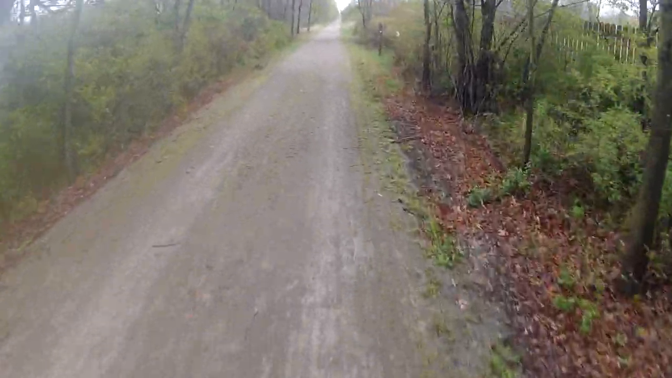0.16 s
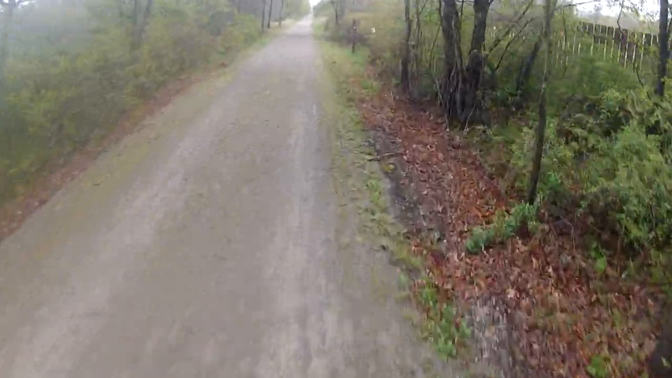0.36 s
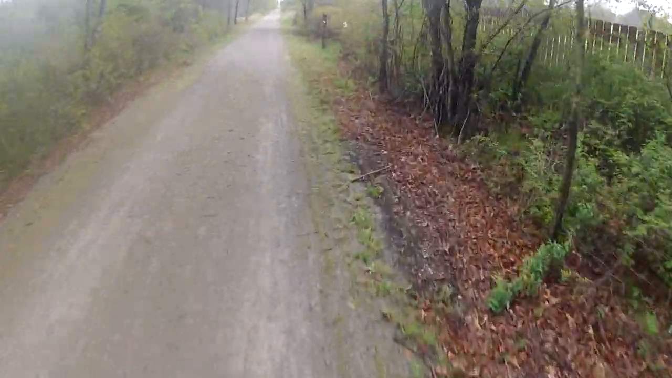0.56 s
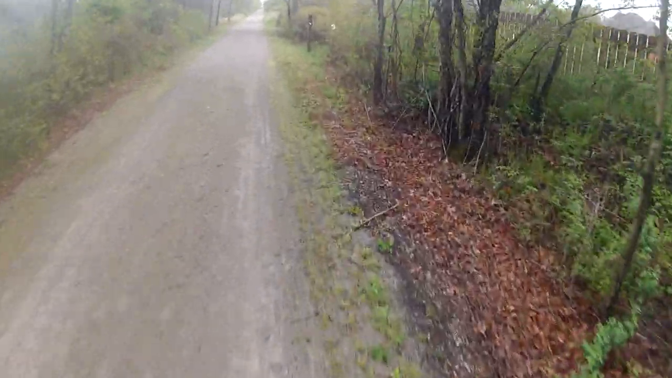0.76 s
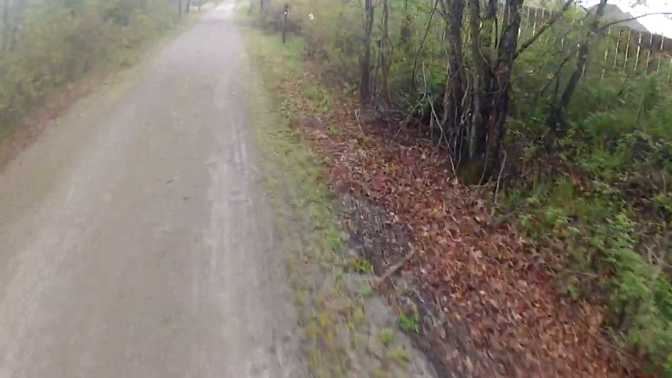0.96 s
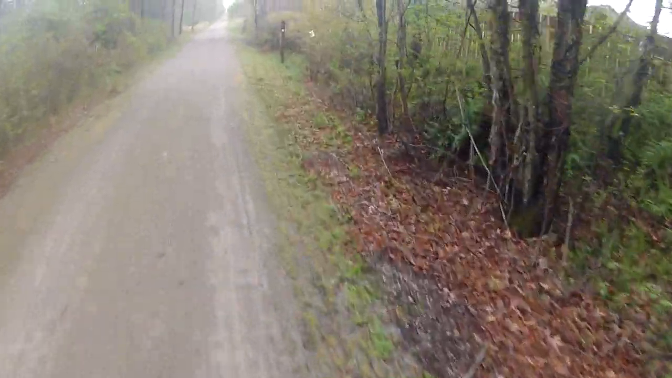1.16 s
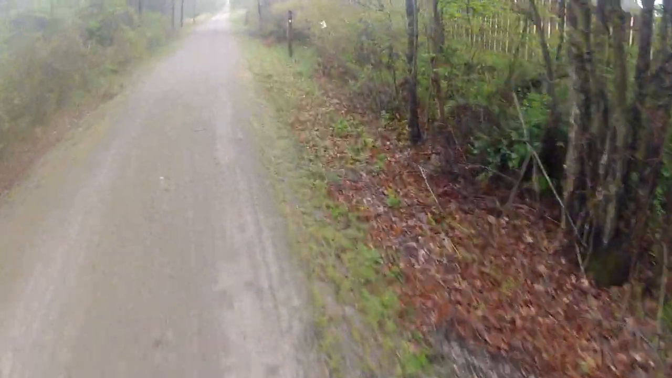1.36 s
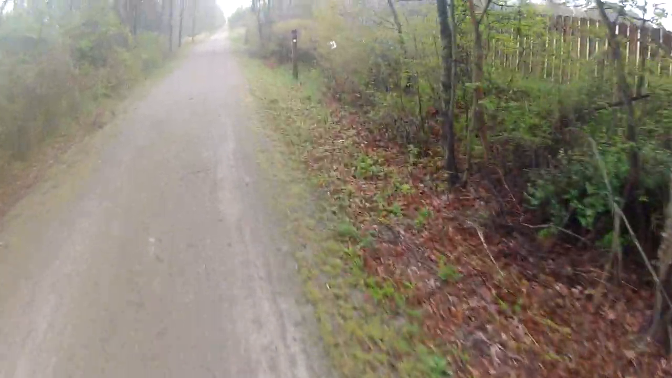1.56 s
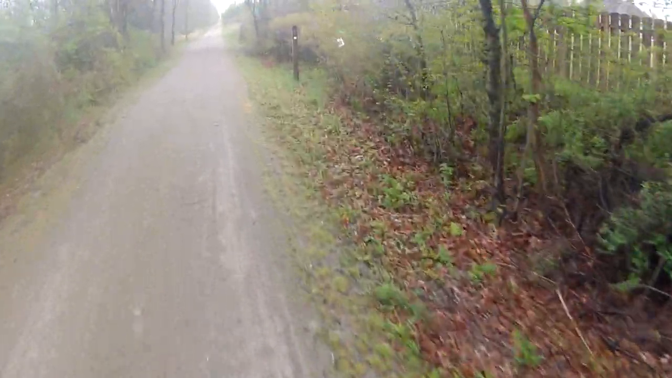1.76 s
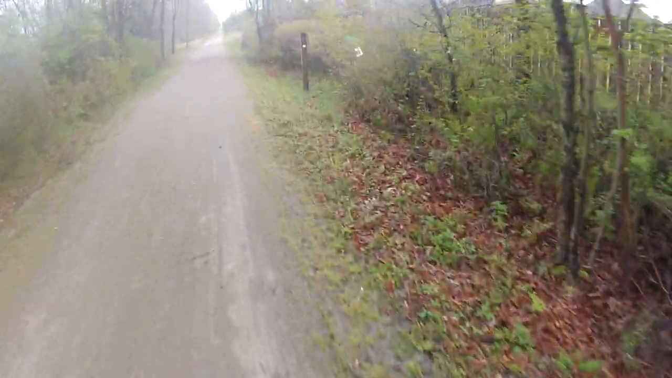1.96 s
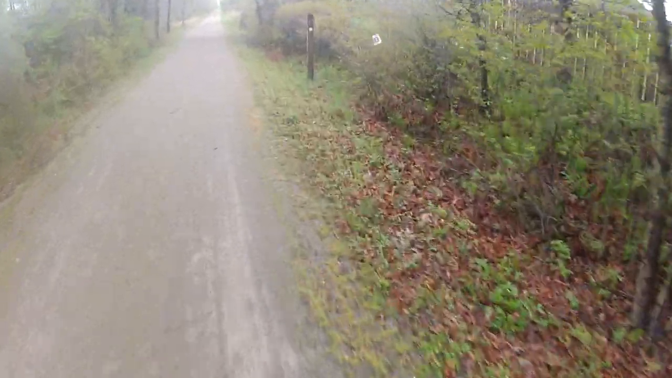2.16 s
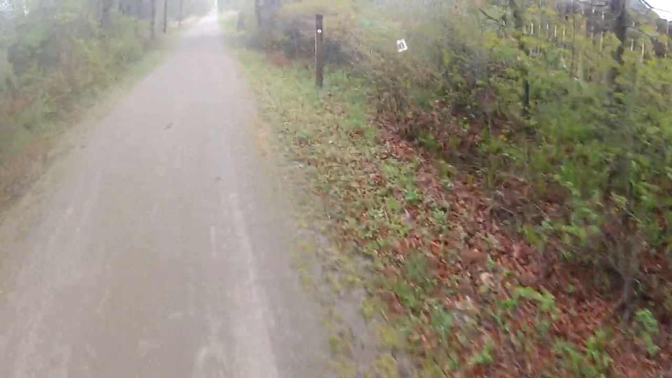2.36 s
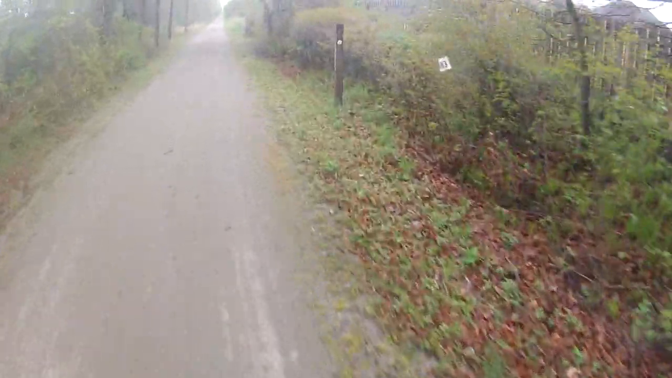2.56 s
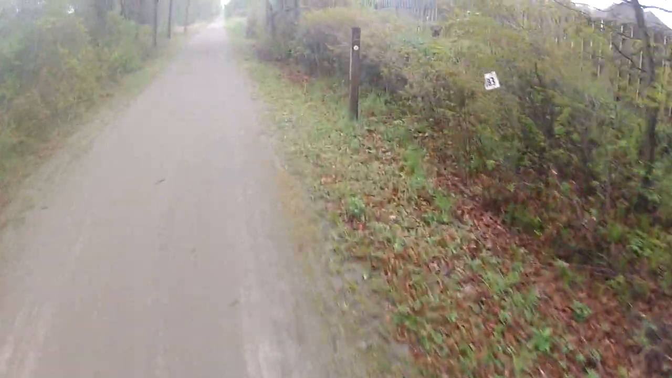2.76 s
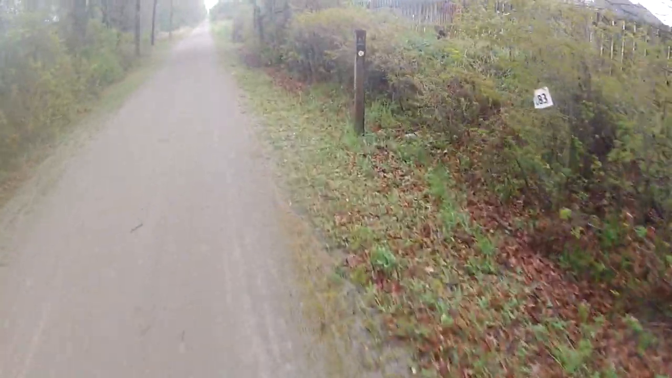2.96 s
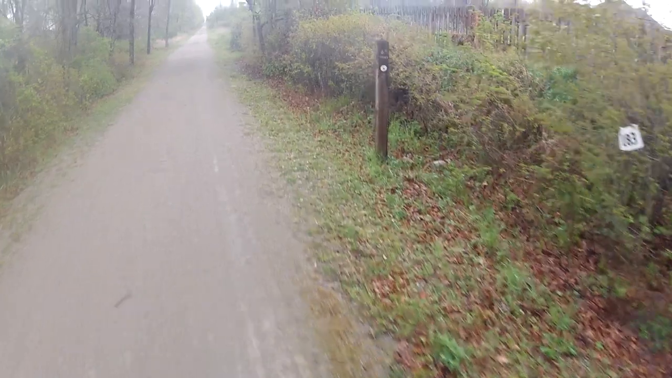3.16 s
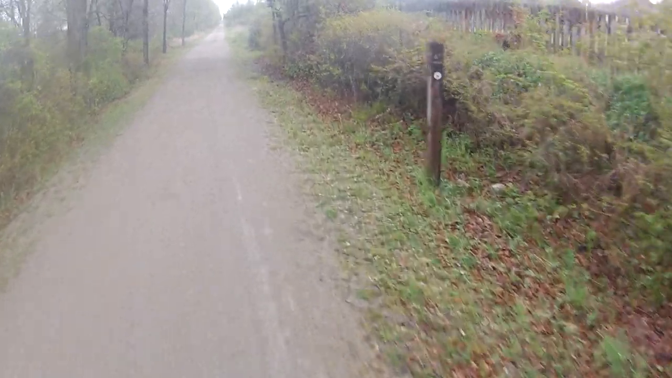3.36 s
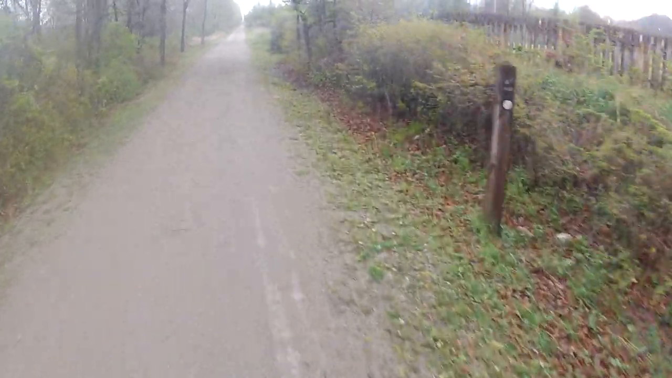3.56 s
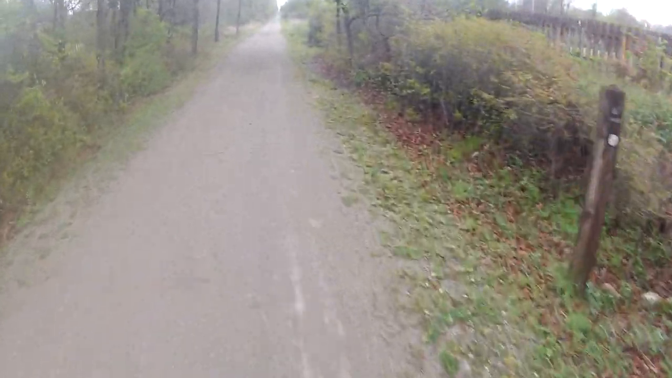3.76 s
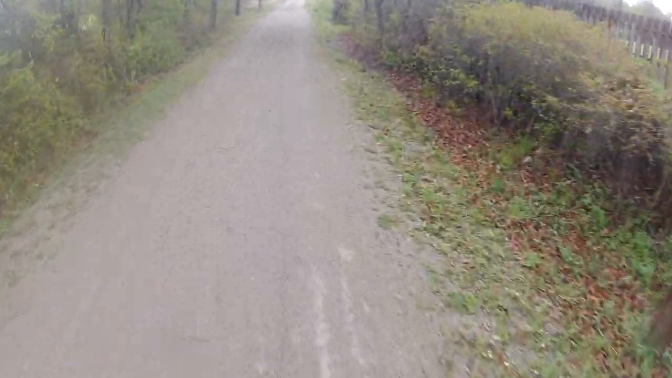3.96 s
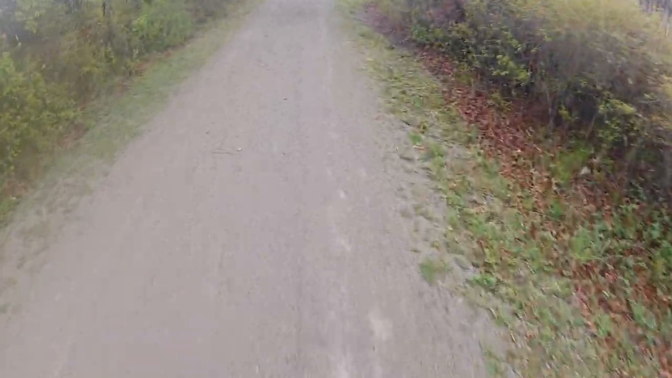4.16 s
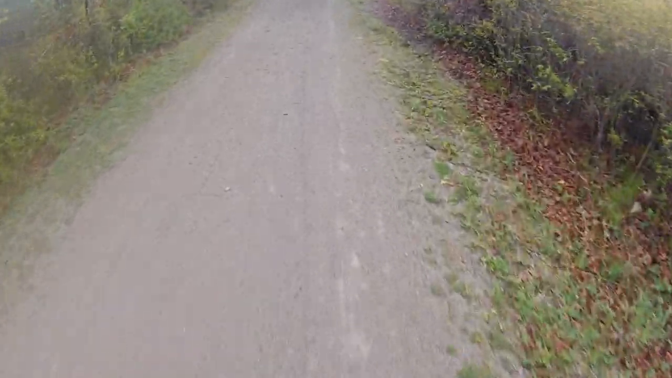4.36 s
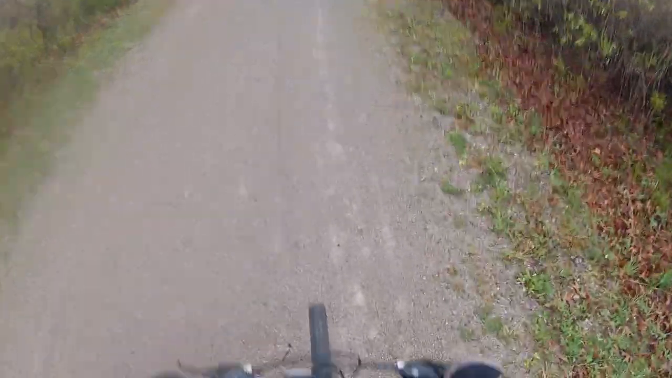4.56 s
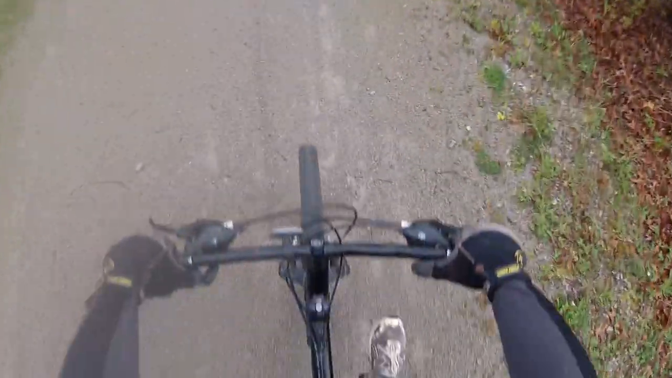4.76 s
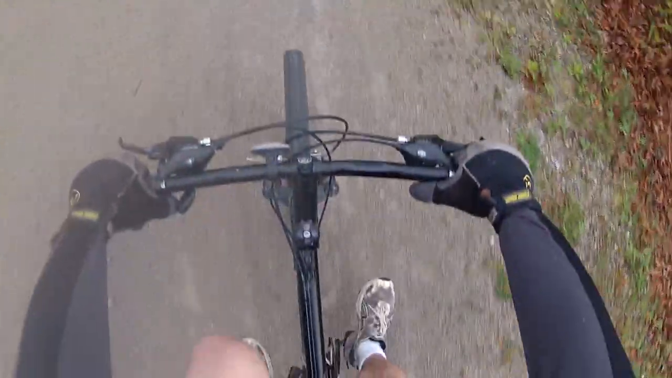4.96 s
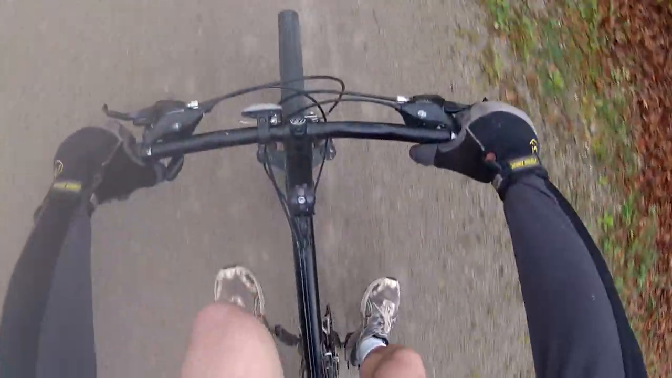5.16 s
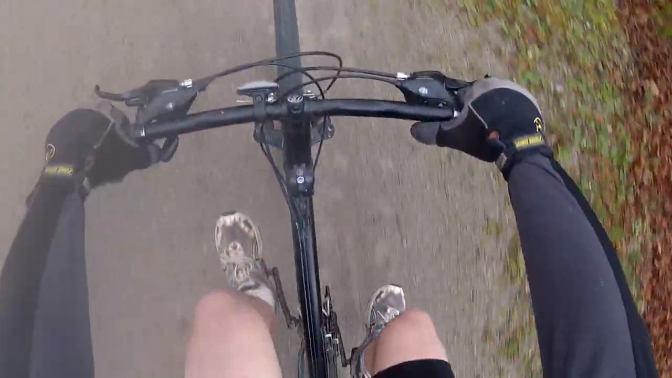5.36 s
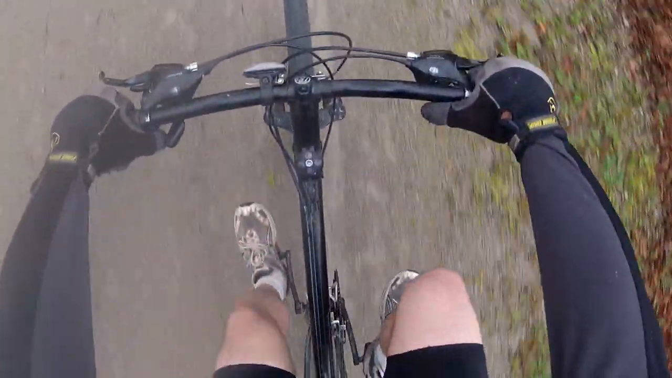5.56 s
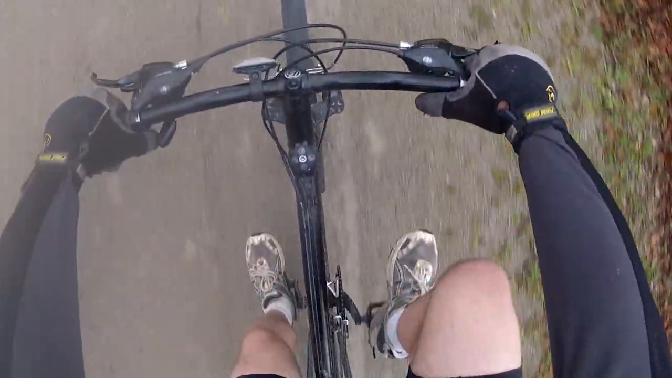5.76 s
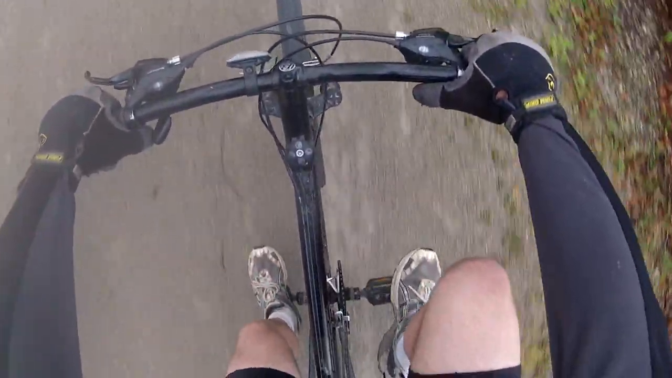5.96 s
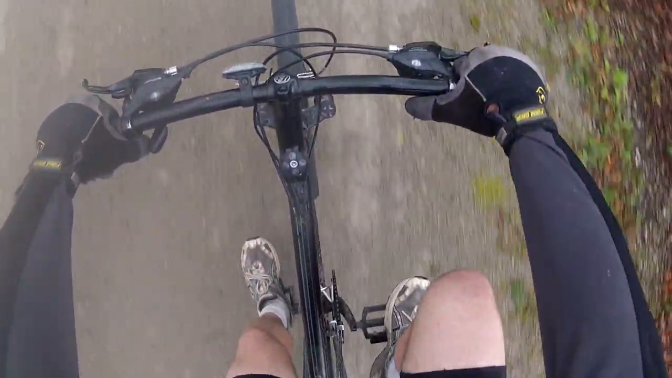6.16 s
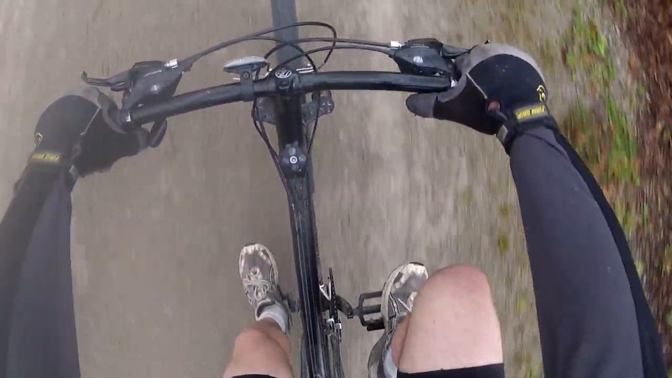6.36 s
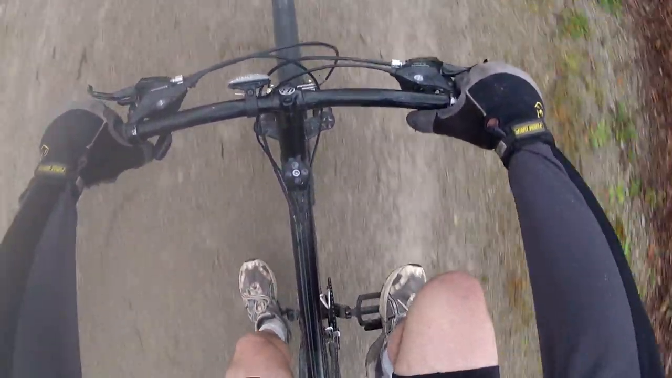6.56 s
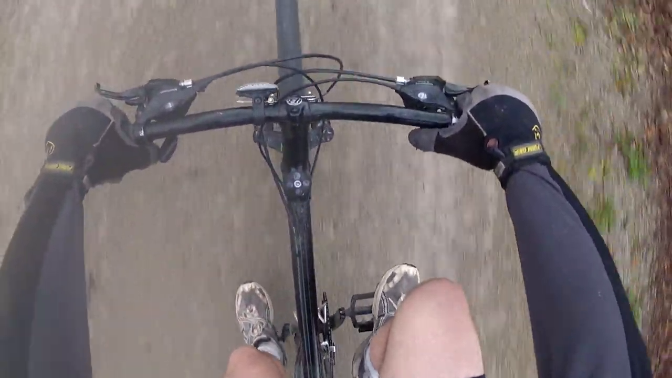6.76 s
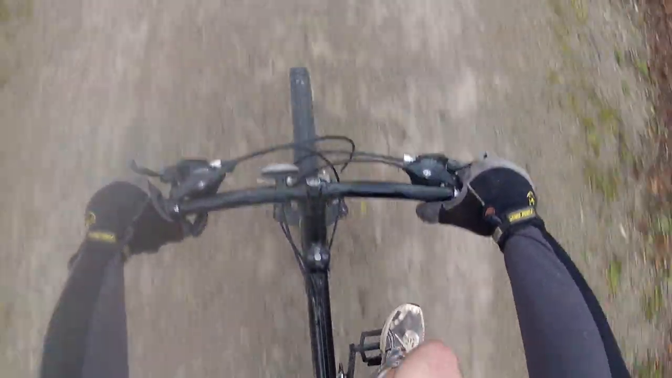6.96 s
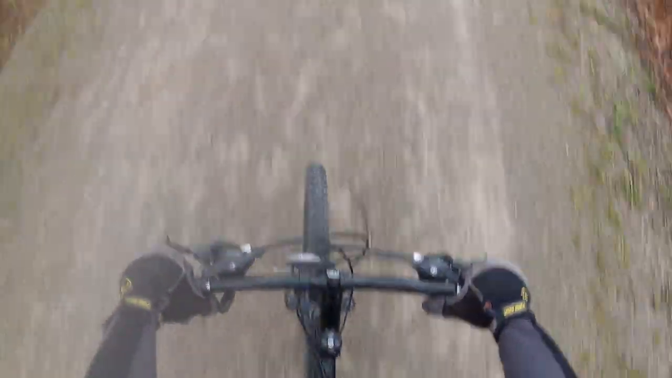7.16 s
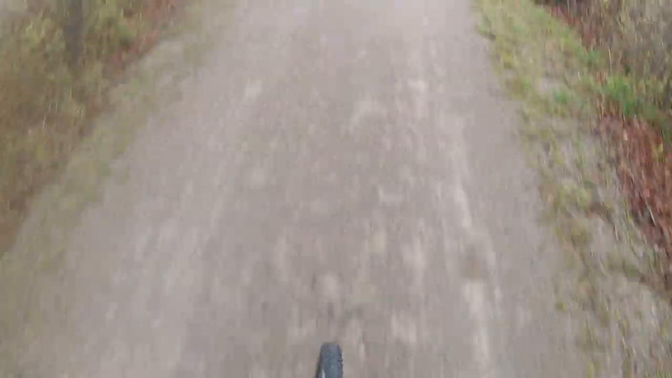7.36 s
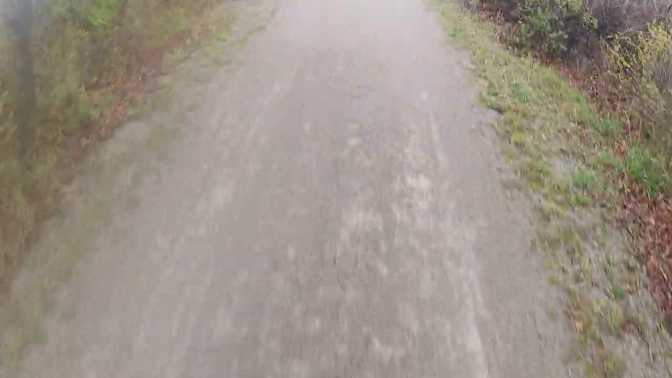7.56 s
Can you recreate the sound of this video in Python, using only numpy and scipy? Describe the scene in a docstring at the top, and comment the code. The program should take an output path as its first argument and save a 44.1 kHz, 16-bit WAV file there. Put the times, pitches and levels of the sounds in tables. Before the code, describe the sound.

Bicycle tyres roll along a gravel trail with a steady humming roar, fine crackling grit and scattered snaps of small stones. Low wind rumbles on a microphone at the rider's chest. Midway, distant birds give two faint whistles and a quick trill among the trees. Then the tyre hum fades and the wind buffets harder, while the crunching goes on with a few dull knocks.

```python
"""Low wind on the microphone and the roar of bicycle tyres on gravel, heard from the rider's chest.
Below, air rings in the tread grooves, grit crackles, stones snap away and dull knocks dot the roar.
Farther off, birds whistle twice and trill among echoing trees. Midway the rider leans over the bars:
the roar is shielded and fades, and eddies buffet the microphone harder.
The camera's image is nearly mono, with a faint hiss that differs between the channels."""
import sys
import numpy as np
from scipy import signal
from scipy.fft import rfft, irfft
from scipy.io import wavfile
from scipy.ndimage import uniform_filter1d

SR = 44100
rng = np.random.default_rng(int(sys.argv[2]) if len(sys.argv) > 2 else 0)


def int16_out(signal):
    """Quantize to a 16-bit WAV file."""
    q = np.round(np.clip(np.atleast_2d(signal).T, -1, 1) * 32767)
    wavfile.write(sys.argv[1], SR, q.astype(np.int16))


N = 335595
TIME = np.arange(N) / SR
FREQS = np.fft.rfftfreq(N, 1 / SR)

# the ride: t/s, pitch factor of the tread roar, lean over the bars (0-1)
RIDE = [(0, 1.067, 0.03), (.9, 1.023, 0.1), (1.6, 1.014, 0), (3.2, 1.005, 0.2), (4.6, 1.04, 0.36),
        (5.1, 1.05, 0.97), (6.5, 1.11, 0.94), (7.25, 1.09, 0.7), (7.5, 1.04, 0.47)]
# gusts on the microphone: middle t/s, length/s, peak level/dB
GUSTS = [(2.21, 0.14, -45), (2.457, 0.19, -41.5), (2.757, .25, -48), (3.05, .25, -51.5), (3.71, 0.098, -45),
         (4.208, 0.17, -48), (4.86, 0.6, -39.5), (5.322, 0.19, -43.5), (5.696, .28, -42.5),
         (6.026, .2, -39.5), (6.265, .32, -36), (6.629, 0.17, -35), (6.876, 0.28, -34.5),
         (7.177, 0.36, -35.5), (7.415, .16, -44.5)]
# spectra of the eddies and of the camera mount's shudder in a lean: f/Hz, relative level/dB
EDDY_COLOUR = [(8, -1), (22, 3), (36, 0), (48, -6), (62, -6.5), (78, -20), (110, -31), (600, -73)]
SHUDDER_COLOUR = [(10, -23.5), (28, -5.5), (40, 0), (50, -9.5), (62, -13), (76, -41), (200, -65)]
# tread roar at the chest, shielded while the rider leans: t/s, level/dB
ROAR_LEVEL = [(0, -55.5), (0.35, -54.5), (0.95, -56), (1.7, -55.5), (2.08, -52), (2.4, -57), (3.9, -57),
              (4.4, -60), (4.7, -57), (5.1, -65), (5.9, -76.5), (6.75, -77.0), (7.2, -72.0), (7.5, -64.5)]
# spectra of the tread roar and the low rolling noise: f/Hz, relative level/dB
ROAR_COLOUR = [(350, -21.5), (610, -18), (695, -4.5), (738, 2.5), (815, -2), (920, -6), (1050, -10.5),
               (1150, -17), (1280, -14), (1750, -22), (3000, -46)]
ROLL_COLOUR = [(30, -4.5), (70, 1.5), (140, -2), (240, -0.5), (330, -6), (480, -10.5), (630, -17),
               (1000, -16.5), (1400, -23.5), (3000, -22), (5500, -31)]
# crunch under the tyres, louder on loose patches: t/s, level/dB before trim
GRIT_LEVEL = [(0.0, -67.5), (0.59, -64), (0.74, -65), (1.82, -67.5), (2.01, -63), (2.33, -66.5),
              (2.79, -65), (3.05, -68.5), (3.37, -68.5), (4.19, -65), (5.14, -67), (5.33, -66), (5.84, -69),
              (6.52, -62.5), (6.75, -65.5), (7.6, -65.5)]
# path from gravel to chest, rider upright and leaning: f/Hz, relative level/dB
PATH_UPRIGHT = [(400, -39.5), (900, 5.5), (1450, -3), (1780, -5.5), (2000, 4), (2230, 6), (2550, -9.5),
                (2900, -3.5), (3500, -4.5), (3950, -14), (4600, -13.5), (5600, -21.5)]
PATH_LEANING = [(400, -29.5), (1000, -3.5), (1300, -16), (1850, -9), (2130, 6.5), (2350, -9), (2600, -19),
                (2900, 3), (3230, -3), (3490, 0.5), (3850, -7.5), (4600, -10), (5600, -14)]
# spectrum of the faint steady microphone hiss and air noise: f/Hz, relative level/dB
HISS_COLOUR = [(30, -17), (100, -1), (250, 1), (480, -3), (900, -27.5), (1600, -18), (3200, -15),
               (4400, -11), (5600, -14)]
# larger stones snapping from under a tyre: t/s, peak level/dB before trim
STONE_SNAPS = [(0.16, -45), (0.4663, -49), (1.091, -42), (1.1875, -37), (1.208, -44), (1.5633, -46),
               (1.9243, -40.5), (2.5277, -43.5), (2.5572, -37.5), (4.0212, -40.5), (4.5351, -39),
               (4.854, -38), (5.2765, -38), (5.445, -41), (5.474, -36.5), (5.8011, -43), (6.249, -45),
               (6.3445, -38), (7.1363, -40), (7.1773, -43), (7.32, -46)]
# the band of a hit: multiple of its centre pitch, relative level/dB
HIT_COLOUR = [(.25, -29), (.5, -6), (.68, 1), (1, 4), (1.4, -0.5), (2.2, -6)]
# short dull knocks and bumps in the tyre roar: t/s, peak level/dB before trim, centre f/Hz
DULL_KNOCKS = [(1.4371, -52, 950), (4.8549, -39.5, 1450), (6.357, -49.5, 1010), (6.4512, -51, 1030),
               (6.5735, -44, 956), (6.8658, -48.5, 1090), (7.2799, -48.5, 996), (7.3577, -53, 1040)]
# bird whistles: start t/s, length/s, f/Hz, scoop from below as a share of f, starting level/dB
WHISTLES = [(3.988, .072, 5610, .15, -72.5), (4.297, .21, 2975, .07, -63)]


def gain_of(db):
    """Decibels to amplitude."""
    return 10 ** (np.asarray(db) / 20)


def unit_rms(x):
    """Scales to rms 1."""
    return x / np.sqrt(np.mean(x ** 2) + 1e-20)


def response(colour, hz):
    """Amplitude of a spectrum at hz, its points joined on a log-frequency axis."""
    f, db = np.transpose(colour)
    return gain_of(np.interp(np.log(hz + 1), np.log(f + 1), db))


def follow(rows):
    """The columns of a timed table at every sample."""
    times, *columns = np.transpose(rows)
    return [np.interp(TIME, times, column) for column in columns]


def add(mix, start_s, sound):
    """Mixes a sound in at start_s."""
    part = mix[max(round(start_s * SR), 0):][:len(sound)]
    part += sound[:len(part)]


def noise(colour):
    """Steady noise of rms 1 with the given spectrum."""
    return unit_rms(irfft(rfft(rng.standard_normal(N)) * response(colour, FREQS), N))


def drift(rate_hz):
    """A smooth random wander of rms 1, mostly slower than rate_hz."""
    return unit_rms(irfft(rfft(rng.standard_normal(N)) * np.exp(-(FREQS / rate_hz) ** 2), N))


def ring(x, colour, size=2048):
    """Minimum-phase filter: every click rings out with the given spectrum."""
    log_gain = np.log(response(colour, abs(np.fft.fftfreq(size, 1 / SR))))
    taps = np.fft.ifft(np.exp(np.conj(signal.hilbert(log_gain)))).real
    return signal.oaconvolve(x, taps[:size // 2])[:len(x)]


def wind(breeze_db=-55.5, lean_db=8.5, shudder_db=7, steadiness=0.4):
    """Eddies thump right on the microphone and swell in gusts; as the rider bends low, the camera mount
    shudders."""
    _, lean = follow(RIDE)
    power = gain_of(breeze_db + lean_db * lean) ** 2
    for middle_s, length_s, db in GUSTS:
        arch = np.cos(np.pi * np.clip((TIME - middle_s) / length_s, -.5, .5))
        power += (gain_of(db) * arch) ** 2
    shudder = gain_of(shudder_db) * lean
    eddies = (noise(EDDY_COLOUR) + shudder * noise(SHUDDER_COLOUR)) / np.sqrt(1 + shudder ** 2)
    # the gusts, more than chance, set the size of the eddies
    chance_swell = np.sqrt(uniform_filter1d(abs(signal.hilbert(eddies)) ** 2, size=3000))
    return np.sqrt(power) * unit_rms(eddies / chance_swell ** steadiness)


def tyres(roll_db=-58.5, flutter_db=0.8):
    """Below the microphone, air roars in the tread grooves over a low rolling noise."""
    pitch, _ = follow(RIDE)
    grooves = np.interp(np.cumsum(pitch) % N, np.arange(N), noise(ROAR_COLOUR))
    flutter = gain_of(flutter_db * drift(35))
    roar = gain_of(follow(ROAR_LEVEL)[0]) * unit_rms(grooves * flutter)
    return roar + gain_of(roll_db) * noise(ROLL_COLOUR)


def snap(hz, t60, scatter, scatter_t60, size=2048):
    """One contact rings briefly, then smaller ones scatter; each t60 is the seconds to fall 60 dB."""
    t = np.arange(size) / SR
    contacts = scatter * rng.standard_normal(size) * gain_of(-60 * t / scatter_t60)
    contacts[0] = 1
    damped_tone = np.sin(2 * np.pi * hz * t) * gain_of(-60 * t / t60)
    return signal.fftconvolve(contacts, damped_tone)[:size]


def grit(per_s=2300, size_db=3.5, clump_db=1.5, trim_db=2, kinds=24):
    """Grains crack in clumps, each kind at its own pitch; the lean colours their path to the chest."""
    sizes = gain_of(size_db * np.minimum(rng.exponential(1, N), 5) + clump_db * drift(37))
    clicks = sizes * rng.choice([-1, 1], N) * (rng.random(N) < per_s / SR)
    kind = rng.integers(0, kinds, N)
    grains = np.zeros(N)
    for k, hz in enumerate(np.linspace(900, 6000, kinds)):
        crack = snap(hz, t60=0.0023, scatter=0.055, scatter_t60=0.052)
        grains += signal.oaconvolve(clicks * (kind == k), crack)[:N]
    _, lean = follow(RIDE)
    at_chest = (1 - lean) * ring(grains, PATH_UPRIGHT) + lean * ring(grains, PATH_LEANING)
    return gain_of(follow(GRIT_LEVEL)[0] + trim_db) * unit_rms(at_chest)


def strikes(rows, trim_db, t60, scatter, scatter_t60):
    """Each hit (t/s, level/dB, f/Hz) snaps in a band round its pitch, then scatters smaller contacts."""
    hits = np.zeros(N)
    for start_s, db, hz in rows:
        band = [(hz * multiple, band_db) for multiple, band_db in HIT_COLOUR]
        hit = ring(snap(hz, t60, scatter, scatter_t60), band)
        add(hits, start_s, gain_of(db + trim_db) * hit / abs(hit).max())
    return hits


def stones(centre_hz=3040):
    """Larger stones snap from under a tyre and spray grit."""
    rows = [(start_s, db, centre_hz) for start_s, db in STONE_SNAPS]
    return strikes(rows, trim_db=-4, t60=0.0015, scatter=0.12, scatter_t60=0.032)


def pebbles(peak_db=-52, spread_db=2, low_hz=2600, high_hz=4500, count=16):
    """Small pebbles tick away from the tyres at random."""
    rows = rng.uniform([0, peak_db - spread_db, low_hz],
                       [N / SR, peak_db + spread_db, high_hz], (count, 3))
    return strikes(rows, trim_db=0, t60=0.0015, scatter=0.095, scatter_t60=0.024)


def knocks():
    """Close by, short dull knocks and bumps sound in the tyre roar."""
    return strikes(DULL_KNOCKS, trim_db=1, t60=0.0011, scatter=0.094, scatter_t60=0.026)


def bird_note(hz, db, rasp):
    """A gliding tone with soft ends, roughened by a random waver in pitch."""
    waver = unit_rms(uniform_filter1d(rng.standard_normal(len(hz)), size=40))
    tone = np.sin(2 * np.pi * np.cumsum(hz * (1 + rasp * waver)) / SR)
    return np.sqrt(2) * gain_of(db) * tone * signal.windows.tukey(len(hz), .25)


def whistles(throb_hz=7.7, throb_db=5.5, fade_db_per_s=32):
    """Each bird whistle scoops up to its pitch, throbs as it fades and sags at the end."""
    song = np.zeros(N)
    for start_s, length_s, hz, scoop_depth, db in WHISTLES:
        t = np.arange(0, length_s, 1 / SR)
        scoop = scoop_depth * np.exp(-t / (.11 * length_s))
        sag = .035 * (t / length_s) ** 3
        level_db = db + throb_db * np.sin(2 * np.pi * throb_hz * t) - fade_db_per_s * t
        add(song, start_s, bird_note(hz * (1 - scoop - sag), level_db, rasp=0.0036))
    return song


def trill(start_s=4.65, every_s=.091, chip_s=.023, base_hz=4200, arch_hz=950, first_db=-65, fade_db=.7):
    """A bird gives five evenly spaced chips, each arching in pitch and softer than the last."""
    song = np.zeros(N)
    glide_hz = base_hz + arch_hz * signal.windows.cosine(round(chip_s * SR))
    for k in range(5):
        add(song, start_s + k * every_s, bird_note(glide_hz, first_db - k * fade_db, rasp=0.07))
    return song


def among_trees(song, echo_db=-8, t60=0.31):
    """Birdsong reaches the trail with a short echo from the trees."""
    t = TIME[:SR // 2]
    echo = rng.standard_normal(len(t)) * gain_of(-60 * t / t60)
    return song + gain_of(echo_db) * signal.oaconvolve(song, echo / np.linalg.norm(echo))[:N]


def scene(hiss_db=-77):
    """Both channels hear the trail alike; faint steady microphone hiss and air noise differ in each."""
    mid = wind() + tyres() + grit() + stones() + pebbles() + knocks()
    mid += among_trees(whistles() + trill())
    side = gain_of(hiss_db) * noise(HISS_COLOUR)
    return np.array([mid + side, mid - side])


def record(dry, corner_hz=5600, hold_hz=12000, edge_hz=15350):
    """The camera samples slowly and holds each sample, which mirrors the sound into the treble."""
    spectrum = rfft(dry) / np.sqrt(1 + (FREQS / corner_hz) ** 48)  # steep low-pass
    bins = np.arange(len(FREQS))
    hold_bin = round(hold_hz * N / SR)
    source_bin = (bins + hold_bin // 2) % hold_bin - hold_bin // 2
    images = spectrum[:, abs(source_bin)]
    images = np.where(source_bin < 0, images.conj(), images)
    # each mirror image is weaker by about the ratio of the two frequencies
    droop = (abs(source_bin) / np.maximum(bins, 1)) ** 0.96
    top_cut = signal.firwin(511, edge_hz, window=("kaiser", 9), fs=SR)
    sign = np.where(source_bin < 0, -1, 1)
    return signal.oaconvolve(irfft(sign * images * droop, N), top_cut[None], "same")


dry = scene()
out = record(dry)
int16_out(out)
```